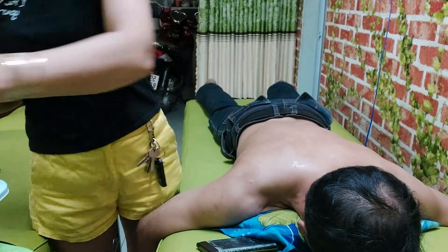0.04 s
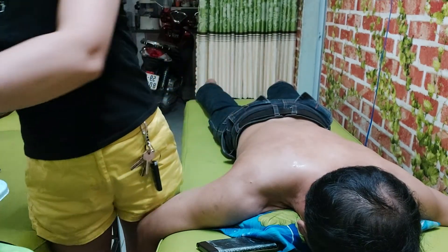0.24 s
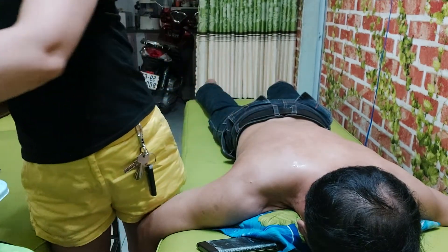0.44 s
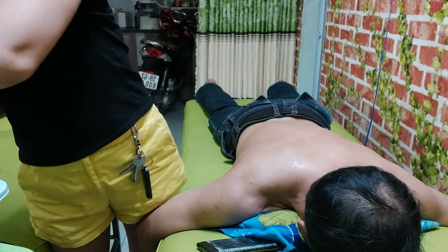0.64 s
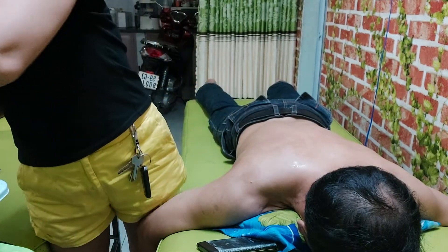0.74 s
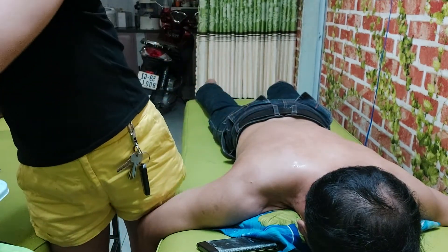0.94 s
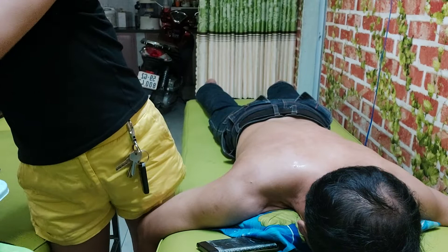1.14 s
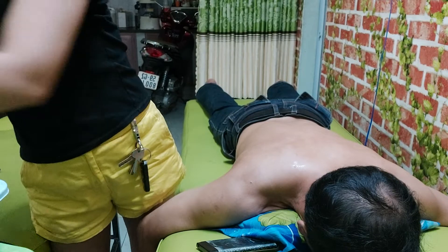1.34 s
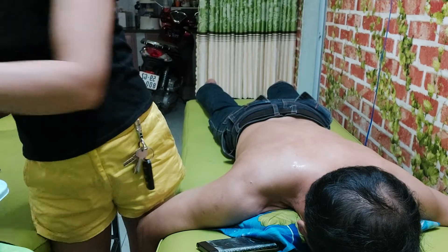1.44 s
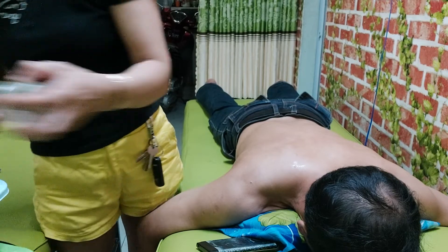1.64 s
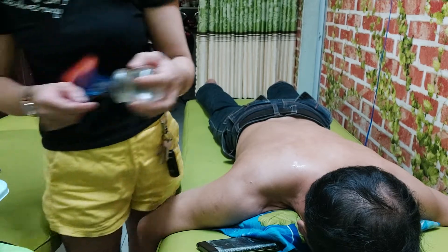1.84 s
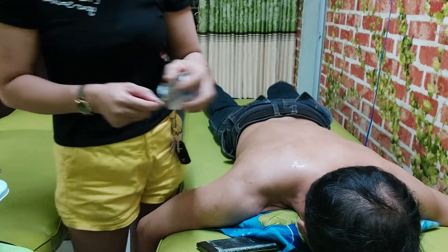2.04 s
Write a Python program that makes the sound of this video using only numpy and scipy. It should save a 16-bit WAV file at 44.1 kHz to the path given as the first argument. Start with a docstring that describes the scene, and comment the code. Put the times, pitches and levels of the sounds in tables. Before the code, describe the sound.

Wet, glassy pops of cupping glasses pulled off oiled skin in two quick runs.

```python
"""Two quick runs of wet, glassy pops: cupping cups pulled off oiled skin in a small hard-walled room.
Each broken seal snaps, sounds the hollow of the cup and sets the glass ringing; small smacks and a
short hiss trail off. A rim sings very faintly, a cup clinks and scrapes, and something knocks in
the hands, all over a low room hum."""
import sys
import numpy as np
from scipy import signal
from scipy.fft import rfft, irfft
from scipy.io import wavfile

SR = 44100
rng = np.random.default_rng(int(sys.argv[2]) if len(sys.argv) > 2 else 0)


def unload_wav(signal):
    """Save mono or channel-first audio to the path in sys.argv[1] as 16-bit WAV at rate SR, clipped to [-1, 1]."""
    wavfile.write(
        sys.argv[1],
        SR,
        np.round(np.clip(np.atleast_2d(signal).T, -1, 1) * 32767).astype(np.int16),
    )


N = 92610
DETUNE = 0.0024  # relative spread of the glass modes from hit to hit


def undb(db):
    """Decibels to gain."""
    return 10 ** (np.asarray(db) / 20)


def fade(t, t60):
    """Exponential decay, 60 dB down after t60 seconds."""
    return np.exp(-np.log(1000) * t / t60)


def later(x, s):
    """Delay by s seconds."""
    return np.concatenate([np.zeros(int(round(s * SR))), x])[:N]


def add(out, s, x):
    """Mix a sound in at s seconds."""
    i = int(s * SR)
    out[i:i + len(x)] += x[:N - i]


def above(x, hz):
    """Gentle high-pass."""
    return signal.sosfilt(signal.butter(2, hz, "high", fs=SR, output="sos"), x)


def noise(points):
    """Noise of rms 1, coloured by (f/Hz, level/dB) points."""
    hz, db = np.array(points).T
    f = np.maximum(np.fft.rfftfreq(N, 1 / SR), 1)
    colour = undb(np.interp(np.log(f), np.log(hz), db)) * (f > 20)
    x = irfft(rfft(rng.standard_normal(N)) * colour, N)
    return x / x.std()


def ring(t, modes, detune=0):
    """A struck body: decaying (f/Hz, level/dB, t60/s) modes, randomly mistuned by detune."""
    out = np.zeros(len(t))
    for hz, db, t60 in modes:
        hz *= 1 + detune * rng.standard_normal()
        out += undb(db) * fade(t, t60) * np.sin(2 * np.pi * hz * t)
    return out


def snap(t, hz, t60=0.0023):
    """One quick swing of pressure that builds for half a cycle and dies."""
    onset = np.minimum(2 * hz * t, 1) ** 2
    return 2 * above(np.sin(2 * np.pi * hz * t) * fade(t, t60) * onset, 310)


def room_tone(wide_hz=330, low_cut_hz=45):
    """A bed of low room noise, nearly mono in the bass, with a faint fan-like hum."""
    air_colour = [(15, -50.5), (25, -27.5), (59, 0.5), (140, -4), (253, -14), (289, -6.5), (349, -14),
                  (389, -13.5), (509, -15), (703, -14), (762, -17), (895, -17.5), (1340, -25.5),
                  (1950, -25), (2420, -32), (4040, -35), (15500, -46.5)]  # spectrum of the bed: f/Hz, level/dB
    air_ride = [(0, -50), (.2, -49), (1.3, -52.5), (1.7, -53.5), (2.1, -52)]  # its slow level ride: t/s, level/dB
    hum_tones = [(298, -62), (711, -61)]  # partials of the hum: f/Hz, level/dB
    waver = [(20, 0), (40, -30), (200, -90)]  # spectrum of their phase wobble: f/Hz, level/dB
    t = np.arange(N) / SR
    side = undb(-1.5) * above(noise(air_colour), wide_hz) + undb(-16.5) * noise(air_colour)
    air = above(noise(air_colour) + side * np.array([[1], [-1]]), low_cut_hz)
    air *= undb(np.interp(t, *np.array(air_ride).T))
    hum = sum(undb(db) * np.sqrt(2) * np.sin(2 * np.pi * hz * t + 0.82 * noise(waver))
              for hz, db in hum_tones)
    return air + hum


def room(x, wet_db, lag_s=0.00043, right_db=-2):
    """Direct sound reaches the left side first; slaps off near surfaces, scatter and a tail follow."""
    echoes = [(.0019, .0024, .25), (.0034, .0037, .3), (.0078, .0074, .28), (0.0122, .0149, .2)]  # near surfaces: left delay/s, right delay/s, gain
    tail_decay = [(150, 0.95), (700, 0.38), (2000, 0.32), (6000, 0.32), (9000, 0.14), (15000, 0.21)]  # reverb time by band: f/Hz, t60/s
    build_s, early_t60, early_share, tail_db = 0.00067, 0.25, 0.49, -5.5
    t, f = np.arange(N) / SR, np.fft.rfftfreq(N, 1 / SR)
    hz, t60s = np.array(tail_decay).T
    build = 1 - np.exp(-t / build_s)
    common = rng.standard_normal(N)  # scatter that both sides share
    out = []
    for side in range(2):
        early = np.sqrt(early_share) * later(common, side * lag_s)
        early += np.sqrt(1 - early_share) * rng.standard_normal(N)
        early *= build * fade(t, early_t60)
        white = rfft(rng.standard_normal(N))
        tail = build * sum(irfft(white * np.interp(f, hz, band), N) * fade(t, t60)
                           for band, t60 in zip(np.eye(len(hz)), t60s))
        walls = early / np.linalg.norm(early) + undb(tail_db) * tail / np.linalg.norm(tail)
        slaps = sum(gain * later(x, delays[side]) for *delays, gain in echoes)
        wet = signal.fftconvolve(x, walls)[:N] + slaps
        direct = undb(side * right_db) * later(x, side * lag_s)
        out.append(direct + undb(wet_db + side * right_db / 2) * wet)
    return np.array(out)


def hiss():
    """Short, soft puffs of bright hiss."""
    puffs = [(1.122, -52, 0.0047, 0.094), (1.141, -66, .008, 0.34), (1.41, -60, 0.0138, 0.11)]  # one puff a row: t/s, level/dB, attack/s, t60/s
    hiss_colour = [(500, -23), (3000, -14), (8000, -1), (11500, 2.5), (15000, -9), (16000, -13)]  # airy spectrum: f/Hz, level/dB
    t = np.arange(N) / SR
    envelope = sum(later(undb(db) * np.minimum(t / attack, 1) * fade(t, t60), s)
                   for s, db, attack, t60 in puffs)
    return noise(hiss_colour) * envelope


def rubbed_rim(start_s=1.24, hz=6442.5, t60=0.08):
    """A rubbed rim swells for an instant into a thin, barely audible note."""
    t, out = np.arange(SR // 2) / SR, np.zeros(N)
    swell = t / 0.27
    add(out, start_s, -swell * ring(t, [(hz, -36, t60)]))
    return out


def knock(start_s=2.0312, attack_s=0.00055, top_hz=3700):
    """A dull knock between the hands, close by; the soft contact leaves no treble."""
    knock_modes = [(950, -13, 0.0055), (1156, 2.5, 0.0088), (1380, 4.5, 0.0078), (2380, -0.5, 0.0068),
                   (3210, -1, 0.008), (3540, -3.5, 0.0081)]  # heavily damped body: f/Hz, level/dB, t60/s
    t, out = np.arange(SR // 5) / SR, np.zeros(N)
    add(out, start_s, undb(-27) * ring(t, knock_modes) * np.minimum(t / attack_s, 1))
    return signal.sosfilt(signal.butter(8, top_hz, fs=SR, output="sos"), above(out, 112))


def clinks(tick_hz=1750, scrape_t60=0.09):
    """One cup touches another: a tick, a light scrape and a ring."""
    contacts = [(1.4545, -26, -45, -52.5), (1.470, -49, -47.5, -48.5)]  # glass on glass: t/s, tick/dB, scrape/dB, ring/dB
    clink_modes = [(784, 5.5, 0.11), (860, 5.5, 0.17), (5460, -7, 0.2), (6400, 1.5, 0.071),
                   (6800, -3, 0.031), (13120, -6.5, 0.084), (14210, -17, 0.13)]  # the tapped cup: f/Hz, level/dB, t60/s
    scrape_colour = [(150, -10), (400, -4), (850, 9), (1300, 5), (2200, -13), (3200, -2.5), (5500, -12),
                     (7000, -6), (8000, -25), (16000, -30)]  # spectrum of the scrape: f/Hz, level/dB
    t, out = np.arange(SR // 2) / SR, np.zeros(N)
    grit = noise(scrape_colour)
    for s, tick_db, scrape_db, ring_db in contacts:
        tick = undb(tick_db) * snap(t, tick_hz)
        scrape = undb(scrape_db) * grit[int(s * SR):][:len(t)] * fade(t, scrape_t60)
        add(out, s, tick + scrape + undb(ring_db) * ring(t, clink_modes, DETUNE))
    return out


def hollow(t, hz, t60, rise_per_s=0.3, overtone_ratio=1.6, overtone_db=-11.5):
    """The air in the opened cup sounds a short, slightly rising note with one overtone."""
    phase = 2 * np.pi * hz * (t + rise_per_s * t ** 2 / 2)
    note = np.sin(phase) + undb(overtone_db) * np.sin(overtone_ratio * phase)
    return note * fade(t, t60) * np.minimum(hz * t, 1)


def glass(t, low_db, middle_db, top_db, highest_db, favoured_hz):
    """The cup wall rings in four zones; the point of contact brings out modes near favoured_hz."""
    glass_modes = [(3996, -7.5, 0.088), (4061, -8.5, 0.069), (5490, -11, 0.071), (5523, 0.5, 0.034),
                   (5550, -8.5, 0.045), (6150, -5.5, 0.027), (7334, -6.5, 0.058), (7493, -5, .07),
                   (7557, -1.5, 0.059), (7686, -1, 0.038), (7960, -9, .09), (8160, 2.5, 0.011),
                   (12365, -4.5, 0.075), (12746, -3.5, 0.085), (13180, -6, 0.065), (13500, -6.5, .05),
                   (13800, -10, .06), (14100, -14.5, .07), (15700, -10, .08)]  # resonances of the cups: f/Hz, level/dB, t60/s
    zone_corners = [4200, 5200, 6000, 7100, 8400, 12000, 14500, 15300]  # corners of the zone curve: f/Hz
    zone_db = [middle_db, low_db, low_db, middle_db, middle_db, top_db, top_db, highest_db]
    favour_db, favour_width_hz, attack_s = 13.5, 49, 0.00075
    struck = []
    for hz, db, t60 in glass_modes:
        boost_db = favour_db * np.exp(-((hz - favoured_hz) / favour_width_hz) ** 2)
        struck.append((hz, db + boost_db + np.interp(hz, zone_corners, zone_db), t60))
    return ring(t, struck, DETUNE) * np.minimum(t / attack_s, 1)


def breaking_seals(rows):
    """Each seal snaps open, air tears through the oil film, and the hollow and the glass ring."""
    spray_colour = [(40, -28.5), (170, -28), (300, -6), (400, -5.5), (800, 10.5), (1250, 6.5), (2300, 4.5),
                    (3300, -1), (6300, -19.5), (8500, -8), (10500, -25), (14000, -25), (16000, -42.5)]  # spectrum of the tearing air: f/Hz, level/dB
    spray_t60, crack_t60, crack_db = 0.025, 0.0025, -18  # the crack is the snap's bright first instant
    skin_ratio, skin_db = 0.77, -8  # the slower swing of the skin under the snap
    t, out = np.arange(SR // 2) / SR, np.zeros(N)
    air = noise(spray_colour)
    for s, snap_db, snap_hz, spray_db, hollow_db, hollow_hz, hollow_t60, *glass_voicing in rows:
        spray = undb(spray_db) * above(air[int(s * SR):][:len(t)] * fade(t, spray_t60), 230)
        crack = undb(crack_db) * above(rng.standard_normal(len(t)) * fade(t, crack_t60), 2500)
        skin = undb(skin_db) * snap(t, skin_ratio * snap_hz)
        transient = undb(snap_db) * (snap(t, snap_hz) - skin + crack)
        body = undb(hollow_db) * hollow(t, hollow_hz, hollow_t60)
        add(out, s, transient + spray + body + glass(t, *glass_voicing))
    return out


def smacks(snap_hz=1950, hollow_t60=0.023):
    """Oily skin smacks on the rim: faint, quickly damped versions of the pops."""
    small_breaks = [(.588, -19, -46, 600, -41), (.621, -19.5, -28, 1020, -52),
                    (0.666, -23.5, -26, 772, -49), (.937, -16.5, -19.5, 808, -64),
                    (.947, -15, -29, 650, -40), (0.991, -32.5, -21, 1020, -42),
                    (1.076, -20, -28, 610, -40.5), (1.147, -28.5, -29, 760, -50),
                    (1.203, -36.5, -32, 609, -68), (1.246, -34.5, -29.5, 597, -70.5)]  # skin leaving the rim: t/s, snap/dB, hollow/dB, hollow f/Hz, glass/dB
    rows = []
    for s, snap_db, hollow_db, hollow_hz, glass_db in small_breaks:
        spray_db = snap_db - 12.5
        glass_voicing = (glass_db - 10, glass_db, glass_db - 8, glass_db - 23.5, 0)  # no favoured mode
        rows.append((s, snap_db, snap_hz, spray_db, hollow_db, hollow_hz, hollow_t60, *glass_voicing))
    return breaking_seals(rows)


def pops():
    """The cups are pulled off the skin in two quick runs."""
    # One broken seal a row: t/s, snap/dB, snap f/Hz, spray/dB, hollow/dB, hollow f/Hz, hollow t60/s,
    # then the glass: low/dB, middle/dB, top/dB, highest/dB, favoured f/Hz
    pulls = [(.2335, -6.5, 2500, -16.5, -16, 545, .06, -34.5, -25, -35, -61.5, 13500),
             (.2845, 2.5, 1900, -10.5, -14, 560, .035, -32.5, -21.5, -30, -60, 12746),
             (.3050, -13.5, 2000, -22.5, -18, 605, .05, -30.5, -29, -41.5, -68, 7960),
             (.3400, -25.5, 2000, -35, -18.5, 580, .04, -54, -38, -55, -75, 7550),
             (.3690, 0.5, 1950, -11.5, -27.5, 620, .05, -41.5, -17.5, -38.5, -67.5, 7647),
             (.3960, -12.5, 2050, -18.5, -18, 622, 0.08, -53, -34.5, -49.5, -64.5, 7950),
             (.4568, 1.5, 2050, -15, -13, 576, 0.034, -30, -19.5, -37.5, -65, 7685),
             (.4725, -14, 1719, -19.5, -17.5, 746, 0.033, -31.5, -34, -43.5, -66.5, 7050),
             (.6957, -2.5, 1500, -14.5, -13, 1037, .055, -48.5, -26.5, -26.5, -15, 12365),
             (.7287, -12, 1500, -21.5, -27, 782, .05, -46, -29.5, -42.5, -33.5, 7600),
             (.7450, -3, 1850, -15, -26, 760, .066, -20.5, -22.5, -24, -34, 7435),
             (.7655, -3.5, 1883, -15, -23.5, 796, .05, -37.5, -22.5, -41.5, -42, 7440),
             (.8095, -16.5, 2600, -22, -24, 750, .05, -7.5, -38, -27, -38.5, 13180),
             (.8160, -2.5, 1720, -18, -12.5, 733, .055, -22.5, -24.5, -36, -48.5, 13190),
             (.8280, -3, 1820, -16.5, -16, 750, .05, -20, -23.5, -28.5, -43, 5710),
             (.8460, -14.5, 2100, -19.5, -20, 680, .05, -26, -25, -37.5, -52, 13800),
             (.8620, -6.5, 1832, -16, -24, 636.7, .06, -47, -25, -46.5, -57, 7460)]
    return breaking_seals(pulls)


def scene():
    """The cups sit to the left; the knock is drier and nearer the middle."""
    mix = room(pops() + hiss(), wet_db=1)
    mix += room(smacks(), wet_db=-2.5)
    mix += room(clinks() + rubbed_rim(), wet_db=1.5)
    mix += room(knock(), wet_db=-5, lag_s=0.00016, right_db=1.5)
    return mix + room_tone()


def record(dry, top_hz=16000):
    """Peaks clip at full scale and a steep low-pass trims the top."""
    return signal.sosfilt(signal.ellip(10, .2, 80, top_hz, fs=SR, output="sos"), np.clip(dry, -1, 1))


dry = scene()
out = record(dry)
unload_wav(out)
```